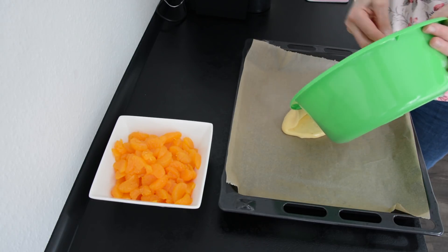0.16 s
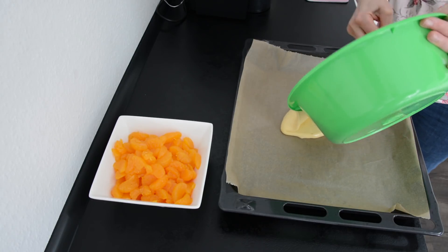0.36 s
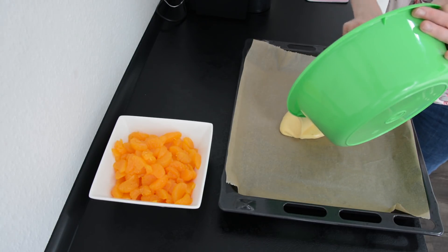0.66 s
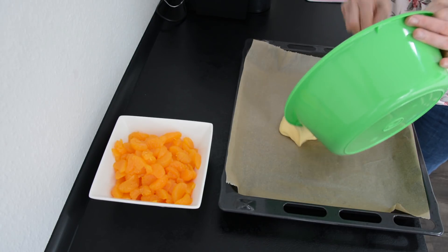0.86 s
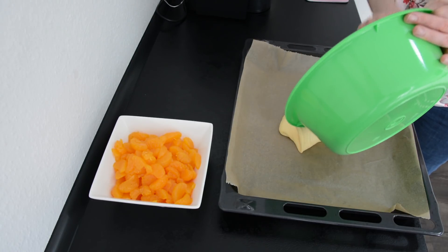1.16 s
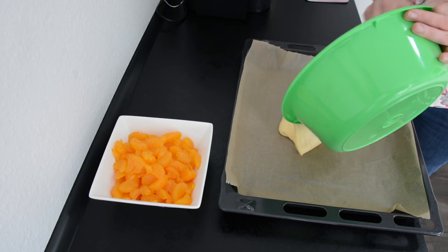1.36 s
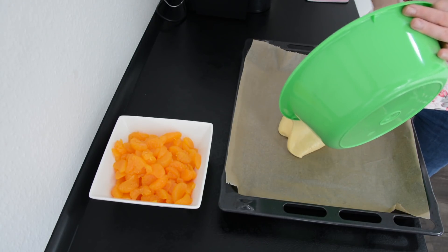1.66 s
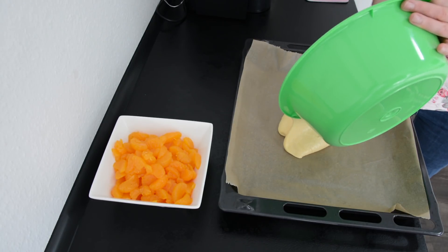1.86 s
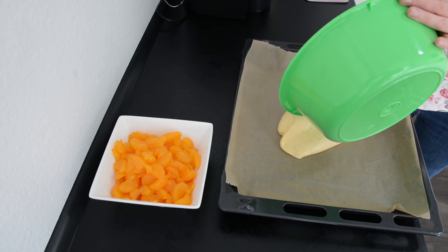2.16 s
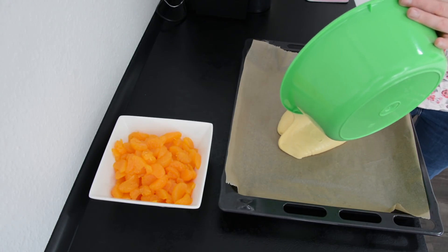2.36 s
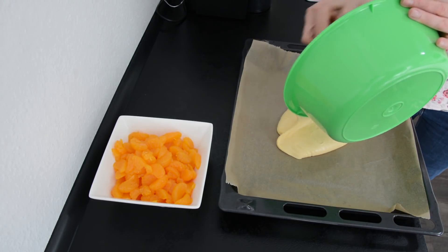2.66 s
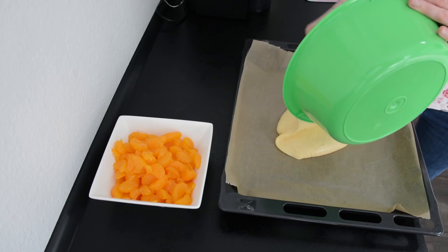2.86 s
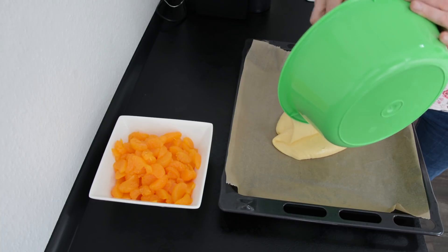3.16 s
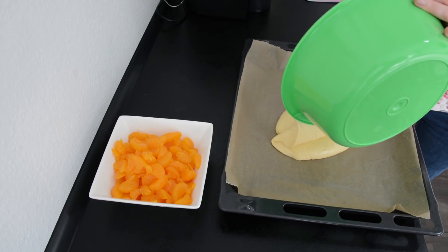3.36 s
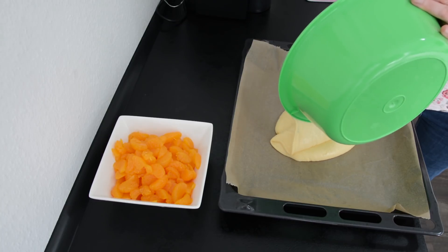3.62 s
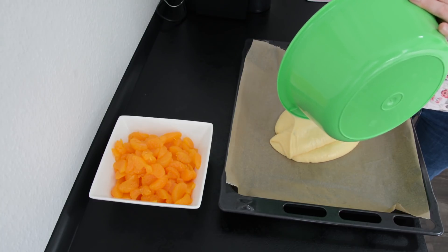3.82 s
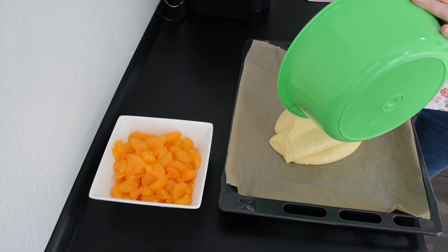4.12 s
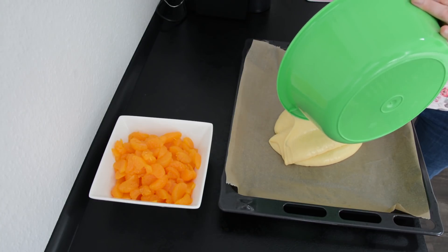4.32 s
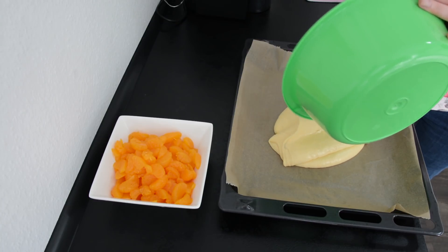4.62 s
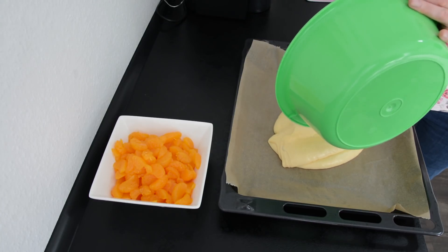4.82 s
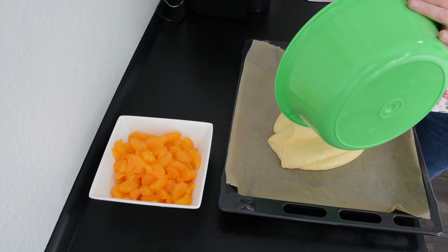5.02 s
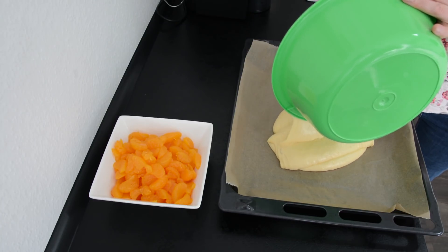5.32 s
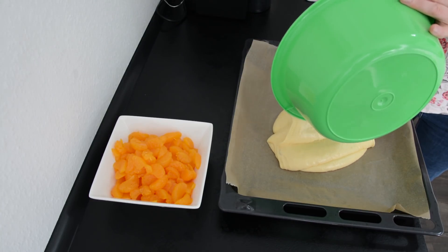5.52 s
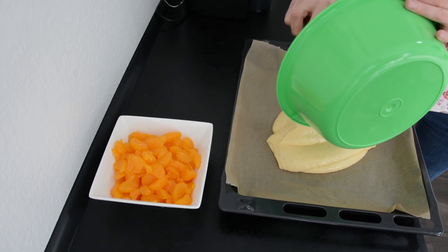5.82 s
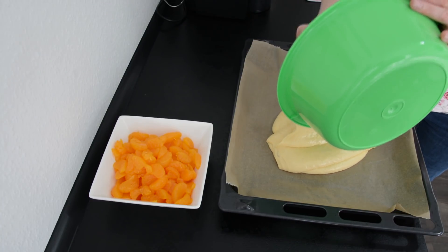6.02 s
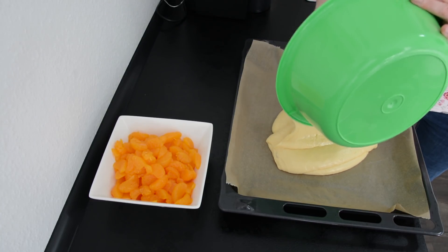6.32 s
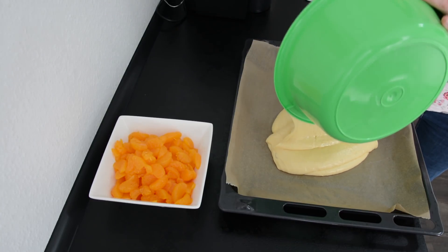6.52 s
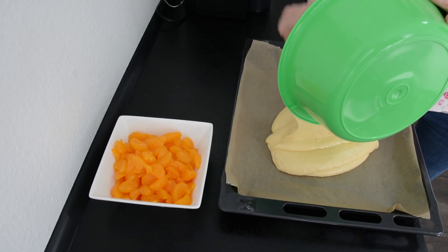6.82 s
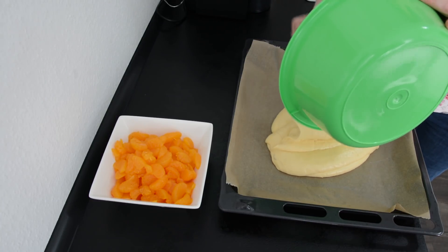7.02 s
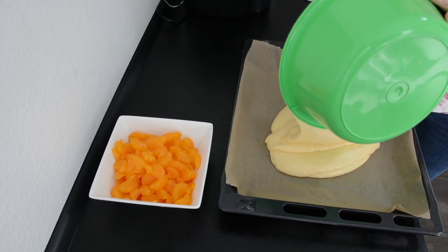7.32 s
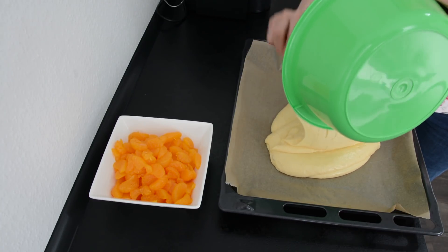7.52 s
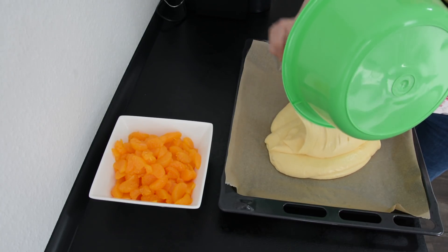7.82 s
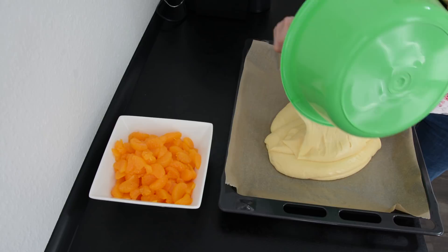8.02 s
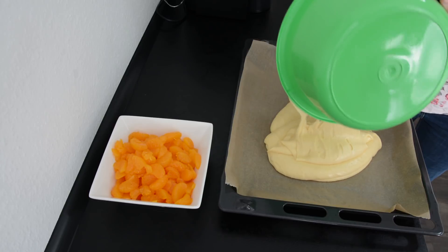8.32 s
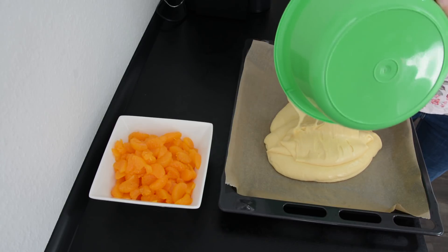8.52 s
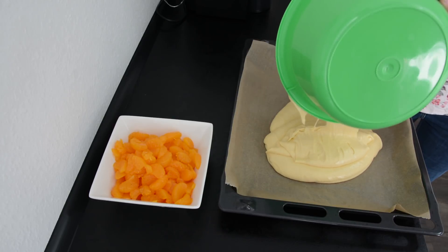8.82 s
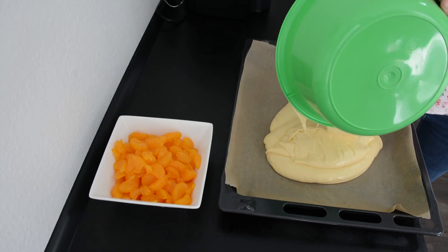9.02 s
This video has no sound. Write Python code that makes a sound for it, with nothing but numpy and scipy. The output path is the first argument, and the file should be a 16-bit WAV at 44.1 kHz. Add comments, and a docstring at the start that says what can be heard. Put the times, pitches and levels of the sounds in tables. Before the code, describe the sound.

Quick scraping of thick batter from a plastic bowl, heard close and centered. Each stroke starts with a boomy, clacking knock, followed by a brief moist, gritty smear; some knocks leave a short hollow note. The hardest blows come in the first few seconds, then brisk hissing swipes, a tiny stuttering slip, and quieter strokes with wet spits and soft wall thuds. Lively small kitchen, low hum and light hiss.

```python
"""Scraping cake batter from a bowl

A spatula clears batter out of a tilted plastic bowl in quick strokes, in a small kitchen.
Strokes knock (noise-like pushes through resonances) and drag a wet, crackly smear (random clicks).
Air pockets smack, the wall thuds and flexes, some knocks leave a note, and the blade judders once.
The room rings briefly over mains hum and hiss; the loudest knocks overload the microphone."""
import sys
import numpy as np
from scipy import signal
from scipy.fft import rfft, irfft, next_fast_len
from scipy.io import wavfile
from scipy.ndimage import uniform_filter1d

SR = 44100
rng = np.random.default_rng(int(sys.argv[2]) if len(sys.argv) > 2 else 0)


def to_wav(s):
    """Save 16-bit WAV."""
    ch = np.atleast_2d(s).T  # columns
    pcm = np.round(np.clip(ch, -1, 1) * 32767)  # PCM
    wavfile.write(sys.argv[1], SR, pcm.astype(np.int16))


N = 404397

# blade lands on the bowl; levels are offsets, note_hz is 0 where no note is left singing:
# start_s, force_db, hardness_db, flatness_db, wall_hz, clack_hz, note_hz
KNOCKS = [(0.036, -9.5, 5.5, -3, 233, 1045, 0), (1.049, -7, 6.5, 4, 222, 1150, 0),
          (1.0951, 4, -5, -1, 232, 990, 0), (1.467, 4.5, 0.5, -5, 231, 1060, 491),
          (1.7686, 6, -5.5, -0.5, 244, 640, 657), (1.8311, 5.5, -4.5, 2, 242, 1260, 280),
          (2.06, 5.5, -2, -5, 237, 784, 247), (2.1041, 6, -5, 2, 275, 1170, 340),
          (2.3025, 8.5, -3.5, -4.5, 310, 660, 517), (2.353, -2.5, 5.5, -4, 440, 970, 0),
          (2.631, 5.5, 2, 6.5, 264, 980, 0), (3.2485, 9.5, -11.5, -3, 250, 855, 1090),
          (3.55, 8.5, -10, -2, 260, 720, 707), (3.787, 0.5, -4, 4, 292, 990, 0),
          (4.01, -4.5, -5.5, 0, 302, 845, 0), (4.315, -1.5, 0.5, 4, 173, 880, 1660),
          (4.383, -4, -3, -2, 295, 950, 0), (4.8647, -5, 8, 3.5, 188, 1050, 0),
          (5.19, -16, 4, 3, 202, 890, 0), (5.4306, 1.5, 10, 2.5, 373, 970, 447),
          (5.8147, 1.5, 3, 0.5, 203, 1330, 1710), (6.203, -7, -1, -1.5, 190, 1460, 0),
          (6.2776, 3, -7.5, 1, 277, 1160, 560), (6.4655, -2.5, 8.5, 0, 293, 1150, 0),
          (6.76, -8, 1.5, 1, 198, 790, 0), (7.205, -11, -0.5, 0, 192, 1210, 0),
          (7.7904, 1.5, -18, 0, 248, 950, 0), (8.649, -14.5, -5, -2, 214, 1190, 0),
          (8.9081, 1.5, 7.5, 2, 300, 1540, 1940)]
# blade drags through batter: start_s, full_speed_s, briskness_db
STROKES = [(0.1, 0.4, -7), (1.08, 0.04, 2), (1.46, 0.005, 0.5), (1.769, 0.02, 2.5), (2.03, 0.03, 2.5),
           (2.302, 0.005, 5), (2.631, 0.18, -6.5), (3.248, 0.01, 0), (3.515, 0, 1), (3.784, 0, 10),
           (4.005, 0, 12), (4.315, 0.2, -9), (4.875, 0.01, -6.5), (5.187, 0, 1), (5.845, 0.05, -10),
           (6.192, 0, -1.5), (6.46, 0, -7), (6.76, 0.11, -15), (7.165, 0.01, -2), (7.795, 0, -2.5),
           (8.1, 0.02, -6), (8.37, 0.08, -13), (8.655, 0.02, -12)]
# air pockets in the batter smack open: start_s, peak_db, centre_hz
SMACKS = [(0.13, -15, 8500), (0.186, -18, 736), (3.159, -23.5, 2220), (4.172, -23.5, 2930),
          (6.82, -19.5, 2340), (6.904, -24, 1300), (7.245, -12.5, 1500), (7.449, -32.5, 3000),
          (7.704, -25, 3830), (7.821, -21.5, 720.8), (7.899, -24.5, 5300), (8.072, -32.5, 3700),
          (8.149, -13.5, 8030)]
# the wall flexes with a soft thud: start_s, peak_db, pitch_hz
THUDS = [(2.642, -26, 217), (7.515, -34.5, 112), (8.088, -27.5, 124), (8.381, -26.5, 174),
         (8.581, -30, 262)]
# resonances that a slip of the blade sets ringing: pitch_hz, width_hz, relative_level_db
BLADE_MODES = [(270, 190, 8), (764, 170, 5.5), (1030, 120, -16)]
# lingering modes of the bowl and the air in it: pitch_hz, relative_level_db
BOWL_MODES = [(130, -1), (231, 1), (335, -13.5), (424, 0.5), (506, 3), (674, -27), (728, -7), (955, -53),
              (1091, -18)]
# tone colour of thick batter: frequency_hz, relative_level_db_per_hz
SMEAR_SPECTRUM = [(120, -19), (220, 3), (320, -4), (450, 2), (800, -1), (1900, -1), (2700, -6.5),
                  (5000, -8), (8900, -14), (11000, -19), (16000, -16)]
# tone colour of the thin batter film: frequency_hz, relative_level_db_per_hz
FILM_SPECTRUM = [(500, -18), (1500, -8), (3000, -2.5), (5000, 2.5), (7000, 1), (8700, 5), (11000, -5.5),
                 (14000, -4), (16000, -19.5)]
# tone colour of the quiet room air: frequency_hz, relative_level_db_per_hz
AIR_SPECTRUM = [(15, -32), (25, -14), (69, -7.5), (240, -3.5), (433, -5.5), (782, -11), (1140, -10),
                (1710, -14.5), (2420, -16), (2850, -17.5), (13200, -20.5), (15500, -22.5)]
# mains hum and a thin electronic whine: pitch_hz, rms_level_db
HUM = [(60, -56.5), (120, -64), (15681, -67)]
# tone colour of each channel's own noise: frequency_hz, relative_level_db_per_hz
SELF_NOISE_SPECTRUM = [(60, 6), (1000, 2), (5000, 0), (16000, 0)]

# clocks in seconds: the whole scene, a short hit and a longer tail
T = np.arange(N) / SR
HIT_T = T[:SR // 10]
TAIL_T = T[:SR * 2 // 3]

AIR_DB, SELF_NOISE_DB = -49.1, -57.5  # rms
# the parts of a knock at force, hardness and flatness 0
WALL_DB, CLACK_DB, CRACK_DB, SNAP_DB, NOTE_DB = -20.1, -20.1, -26.4, -32.3, -28.4
# dB gained per dB of force: the wall yields, so strong blows sound brighter
WALL_GROWTH, SNAP_GROWTH, NOTE_GROWTH = 0.31, 1.2, 0.3
FLAT_MUFFLING = 0.33  # a flat blade booms more; each dB of it takes this many dB off snap and note
NOTE_HZ, NOTE_DB_PER_OCTAVE = 500, -1.3  # higher notes sing more weakly
NOTE_FADING_DB_PER_S = -0.55  # later knocks leave weaker notes

# every stroke: the blade rests, speeds up, holds, then lifts off
REST_S, SPEED_UP_S, LIFT_S = 0.016, 0.078, 0.056
LIFT_PER_HOLD = 0.25  # long strokes also lift off more slowly
SPEED_SAG_PER_S = 0.55  # share of its speed that a held stroke loses
SMEAR_DB, FILM_DB = -37, -38.3  # thick batter and thin film at briskness 0, time 0, full speed
SMEAR_GROWTH = 0.19  # dB per dB of briskness; the film follows it fully
EMPTYING_DB_PER_S = -0.28  # less batter is left to push

# the blade sticks and slips a few times; each gap is longer by the slowing factor
JUDDER_S, SLIP_GAP_S, SLIP_SLOWING = 4.6525, 0.0125, 1.2
FIRST_SLIP_DB, SLIP_DB = -22.5, -16  # peak levels
TOP_HZ = 16000  # upper limit of the sound


def undb(db):
    """Turn decibels into a gain."""
    return 10 ** (np.asarray(db) / 20)


def level(x, db):
    """Scale to an rms (average) level."""
    return x * undb(db) / np.sqrt(np.mean(x ** 2))


def blow_level(x, db):
    """Give a short sound the energy of 10 ms at this rms level."""
    return x * undb(db) / np.sqrt(np.sum(x ** 2) * 100 / SR)


def peak_level(x, db):
    """Scale so that the highest point has this level."""
    return x * undb(db) / np.abs(x).max()


def add(track, s, x):
    """Mix a sound into a track at a time in seconds."""
    i = int(s * SR)
    track[i:i + len(x)] += x[:N - i]


def fade(t60_s):
    """A dying sound: 60 dB down after t60_s."""
    return np.exp(-np.log(1000) * TAIL_T / t60_s)


def colour(x, points):
    """Shape by a spectrum of (Hz, dB) points, keeping the level of white noise."""
    hz, db = np.transpose(points)
    size = next_fast_len(len(x))
    bins_hz = np.fft.rfftfreq(size, 1 / SR)
    gain = undb(np.interp(np.log(bins_hz + 1), np.log(hz), db))
    return irfft(rfft(x, size) * level(gain, 0), size)[:len(x)]


def resonate(x, hz, width_hz):
    """One resonance with gain 1 at its centre."""
    hz = min(hz, SR / 3)
    sharpness = hz / min(width_hz, SR / 4)
    b, a = signal.iirpeak(hz, sharpness, fs=SR)
    return signal.lfilter(b, a, x)


def band(x, lo_hz, hi_hz, order=2):
    """Keep only the frequencies between two limits."""
    limits_hz = [lo_hz, min(hi_hz, SR / 2 - 1)]
    return signal.sosfilt(signal.butter(order, limits_hz, "band", fs=SR, output="sos"), x)


def walk(rate):
    """Smooth random drift, about this many new values a second, with an rms of 1."""
    k = int(SR / rate)
    steps = np.repeat(rng.standard_normal(N // k + 1), k)
    return level(uniform_filter1d(steps, k)[:N], 0)


def crackle(rate, spread_db):
    """Tiny random clicks, about this many a second; a larger spread makes sizes less equal."""
    there = rng.random(N) < rate / SR
    size = undb(spread_db * np.minimum(rng.exponential(size=N), 5))
    return level(there * size * rng.standard_normal(N), 0)


def background():
    """Quiet room air with steady hum; each channel has a trace of its own noise."""
    hum = np.zeros(N)
    for hz, db in HUM:
        hum += np.sqrt(2) * undb(db) * np.sin(2 * np.pi * (hz * T + rng.random()))
    air = colour(rng.standard_normal(N), AIR_SPECTRUM)
    own = np.array([colour(noise, SELF_NOISE_SPECTRUM) for noise in rng.standard_normal((2, N))])
    return hum + level(air, AIR_DB) + level(own, SELF_NOISE_DB)


def contact(chatter, decay_s):
    """One sharp push together with dying random chatter."""
    noise = rng.standard_normal(len(TAIL_T)) * np.exp(-TAIL_T / decay_s)
    push = chatter * noise / np.sqrt(decay_s * SR / 2)
    push[0] -= 1
    return push


def echo(t60_s):
    """The kitchen's diffuse tail with unit energy; never the same twice, as the bowl keeps moving."""
    build_up = 1 - np.exp(-(TAIL_T / 0.0031) ** 2)
    tail = rng.standard_normal(len(TAIL_T)) * fade(t60_s) * build_up
    return tail / np.sqrt(np.sum(tail ** 2))


def strike(body, db, chatter, decay_s, t60_s, wet_db):
    """A contact sounds through a body; the room answers in the same colour."""
    direct = blow_level(body(contact(chatter, decay_s)), db)
    answer = blow_level(body(echo(t60_s)), db + wet_db)
    return direct + answer


def knocks():
    """The soft plastic wall booms for a few cycles, the blade clacks, and hard contact adds crack and snap."""
    out = np.zeros(N)
    for s, force_db, hard_db, flat_db, wall_hz, clack_hz, _ in KNOCKS:
        wall_db = WALL_DB + WALL_GROWTH * force_db + flat_db
        clack_db = CLACK_DB + force_db
        crack_db = CRACK_DB + force_db + hard_db
        snap_db = SNAP_DB + SNAP_GROWTH * force_db + hard_db - FLAT_MUFFLING * flat_db
        # batter cushions the softer blows, so their crack stops lower
        edge_hz = np.interp(force_db, [-3, 7], [2350, 3100])

        def wall(x):
            return band(resonate(x, wall_hz, width_hz=130) + 0.2 * x, lo_hz=103, hi_hz=683, order=4)

        def clack(x):
            return band(resonate(x, clack_hz, width_hz=420) + 0.12 * x, lo_hz=426, hi_hz=1620)

        def crack(x):
            return band(x, lo_hz=1340, hi_hz=edge_hz, order=3)

        def snap(x):
            return band(x, lo_hz=2850, hi_hz=6900)

        add(out, s, strike(wall, wall_db, chatter=0.64, decay_s=0.0098, t60_s=0.48, wet_db=-3.5))
        add(out, s, strike(clack, clack_db, chatter=0.8, decay_s=0.0059, t60_s=0.62, wet_db=-7.0))
        add(out, s, strike(crack, crack_db, chatter=2.5, decay_s=0.0035, t60_s=0.45, wet_db=-3))
        add(out, s, strike(snap, snap_db, chatter=2.6, decay_s=0.0033, t60_s=0.4, wet_db=-2.5))
    return out


def bowl(x, t60_s, ring_db):
    """The bowl hums on briefly after every blow, as a sum of fading tones."""
    tones = sum(undb(db) * np.sin(2 * np.pi * hz * TAIL_T) for hz, db in BOWL_MODES)
    ring = tones * fade(t60_s)
    return x + undb(ring_db) * signal.fftconvolve(x, ring)[:N]


def scraping():
    """Batter tears in countless tiny bursts; the blade speeds up and slows down, gripping unevenly."""
    smear, film = np.zeros(N), np.zeros(N)  # loudness curves
    for s, hold_s, brisk_db in STROKES:
        corners = np.cumsum([REST_S, SPEED_UP_S, max(hold_s, 0), LIFT_S + LIFT_PER_HOLD * hold_s])
        end_speed = max(1 - SPEED_SAG_PER_S * hold_s, 0)
        speed = np.interp(T[:SR], corners, [0, 1, end_speed, 0])
        smear_db = SMEAR_DB + SMEAR_GROWTH * brisk_db + EMPTYING_DB_PER_S * s
        add(smear, s, undb(smear_db) * speed ** 0.65)
        add(film, s, undb(FILM_DB + brisk_db) * speed ** 1.6)  # the thin film only hisses at speed
    grip = undb(1.8 * walk(70))
    # bubbles of every size burst in small flurries, each ringing for a few cycles
    bubbles = np.zeros(N)
    for hz in np.geomspace(600, 9000, num=12):
        flurries = undb(3.3 * walk(90))
        bubbles += flurries * resonate(crackle(rate=700, spread_db=2.3), hz, width_hz=0.26 * hz)
    pops = band(crackle(rate=70, spread_db=3.0), lo_hz=900, hi_hz=6000)  # larger ones stand out singly
    tearing = crackle(rate=5000, spread_db=3.0)
    thick = colour(level(tearing, -4) + level(bubbles, -4) + level(pops, -18), SMEAR_SPECTRUM)
    thin = colour(crackle(rate=9000, spread_db=0.0), FILM_SPECTRUM)
    return grip * (smear * thick + film * thin)


def kitchen(x, t60_s, wet_db):
    """Each tenth of a second of sound gets its own room tail."""
    wet, step = np.zeros(N), SR // 10
    for i in range(0, N, step):
        add(wet, i / SR, signal.fftconvolve(x[i:i + step], echo(t60_s)))
    return x + undb(wet_db) * wet


def smacks():
    """A pocket opens with a brief wet spit around its own pitch."""
    out = np.zeros(N)
    for s, db, hz in SMACKS:
        def pocket(x):
            return band(resonate(x, hz, width_hz=0.5 * hz), lo_hz=550, hi_hz=12900)

        spit = strike(pocket, 0, chatter=7, decay_s=0.0054, t60_s=0.39, wet_db=-4.5)
        add(out, s, peak_level(spit, db))
    return out


def rings(t60_s, width_hz):
    """Some knocks leave a narrow, beating resonance that swells and dies away."""
    out = np.zeros(N)
    for s, force_db, _, flat_db, _, _, hz in KNOCKS:
        if hz > 0:
            db = NOTE_DB + NOTE_GROWTH * force_db + NOTE_DB_PER_OCTAVE * np.log2(hz / NOTE_HZ)
            db += NOTE_FADING_DB_PER_S * s - FLAT_MUFFLING * flat_db
            width = width_hz + 0.09 * hz  # higher notes are damped more
            noise = rng.standard_normal(len(TAIL_T))
            note = resonate(resonate(noise, hz, width), hz, width)
            add(out, s, level(note, db) * fade(t60_s))
    return out


def thuds():
    """A slow push bends the wall: a rounded swing with little treble."""
    out = np.zeros(N)
    for s, db, hz in THUDS:
        swing = np.sin(2 * np.pi * hz * HIT_T) * HIT_T * np.exp(-HIT_T / 0.0042)
        add(out, s, peak_level(swing, db))
    return out


def judder(count=4):
    """The rubbery blade sticks and slips; each slip is a short, dull pulse."""
    def blade(x):
        modes = sum(undb(db) * resonate(x, hz, width_hz) for hz, width_hz, db in BLADE_MODES)
        return band(modes, lo_hz=120, hi_hz=1850, order=4)

    out, s = np.zeros(N), JUDDER_S
    for k in range(count):
        slip = strike(blade, 0, chatter=0.1, decay_s=0.002, t60_s=0.45, wet_db=-7)
        add(out, s, peak_level(slip, SLIP_DB if k else FIRST_SLIP_DB))
        s += SLIP_GAP_S * SLIP_SLOWING ** k
    return out


def scene():
    """The bowl is straight ahead and reaches both channels alike."""
    blows = bowl(knocks() + judder(), t60_s=0.31, ring_db=-57)
    notes = rings(t60_s=0.6, width_hz=54)
    batter = kitchen(scraping(), t60_s=0.37, wet_db=-5.0) + smacks()
    flexing = kitchen(thuds(), t60_s=0.73, wet_db=-12.5)
    return blows + notes + batter + flexing + background()


def record(dry):
    """The microphone overloads sooner on one side of the wave; the top is cut."""
    ceiling = np.where(dry > 0, 0.64, 1.1)
    rounded = dry / (1 + (dry / ceiling) ** 4) ** (1 / 4)
    top_cut = signal.ellip(8, 0.2, 70, TOP_HZ, fs=SR, output="sos")
    return signal.sosfilt(top_cut, rounded)


dry = scene()
out = record(dry)
to_wav(out)
```